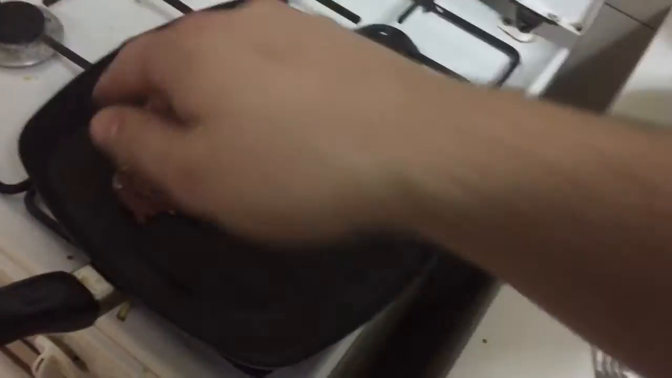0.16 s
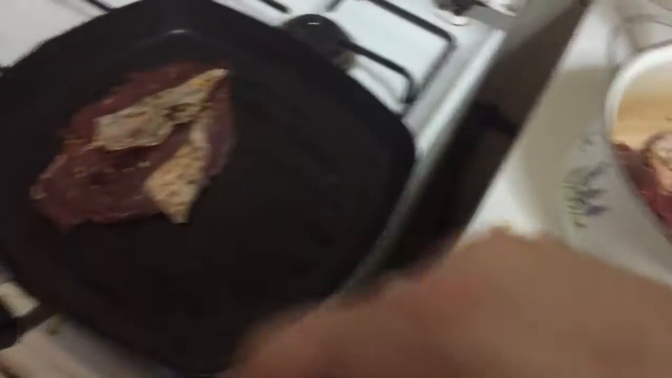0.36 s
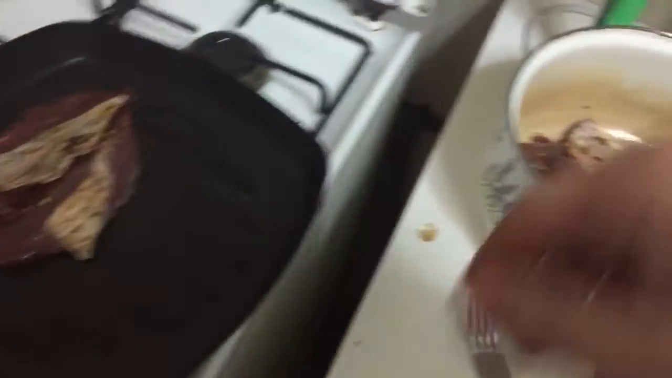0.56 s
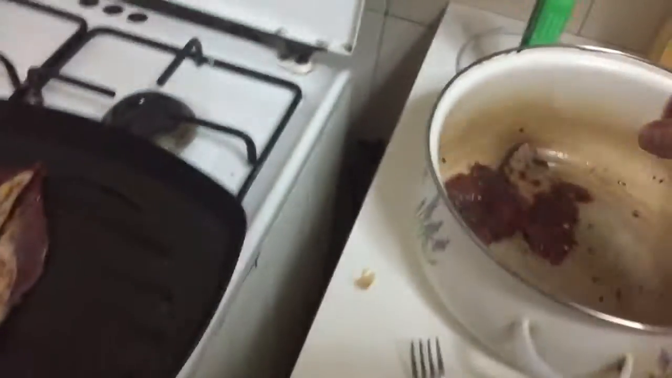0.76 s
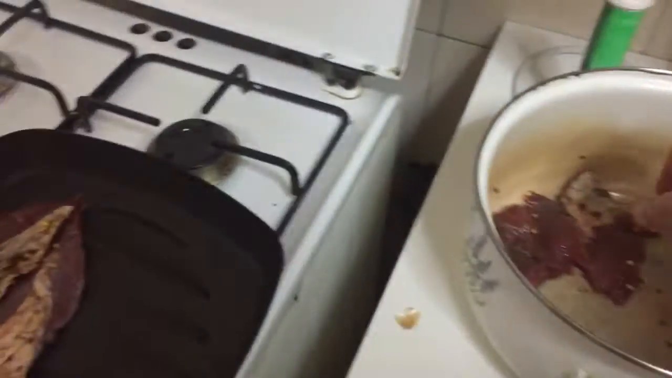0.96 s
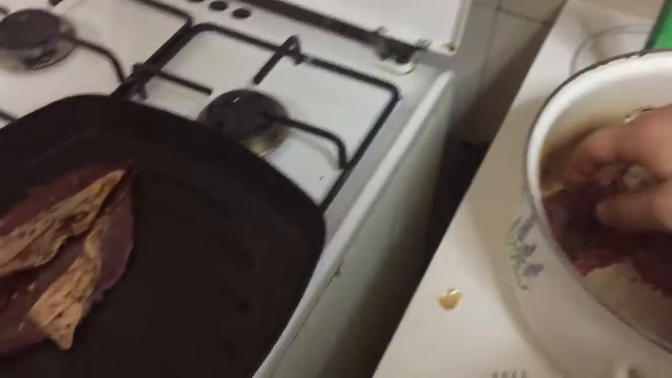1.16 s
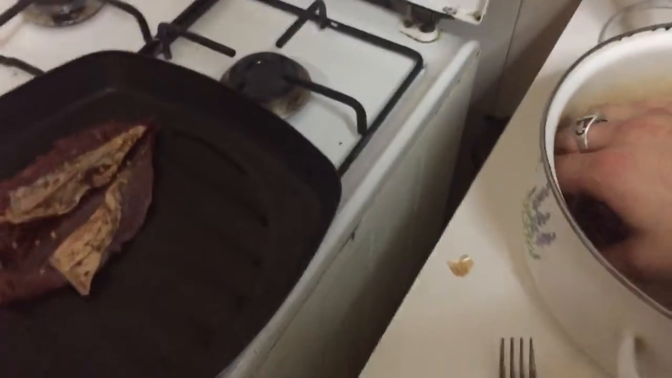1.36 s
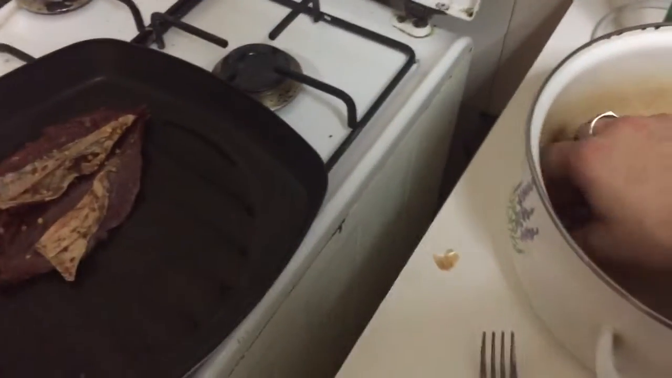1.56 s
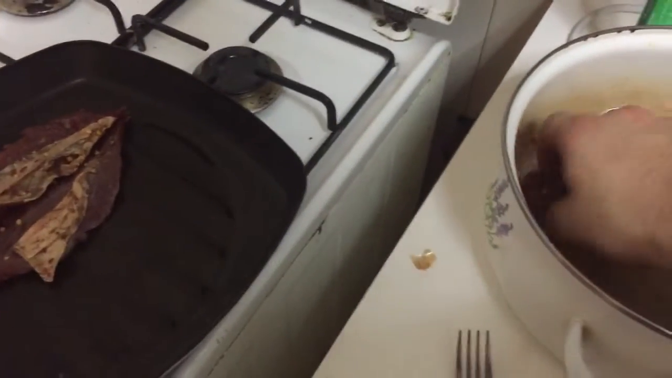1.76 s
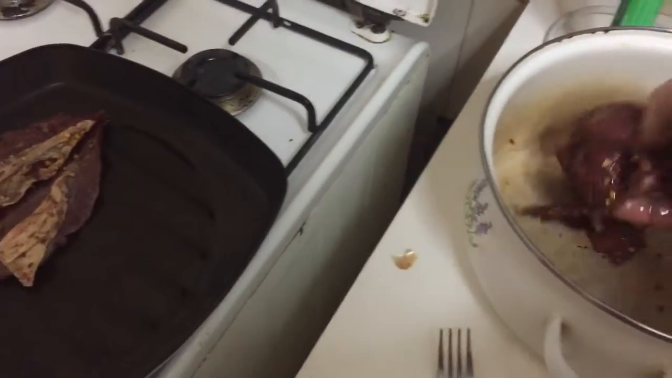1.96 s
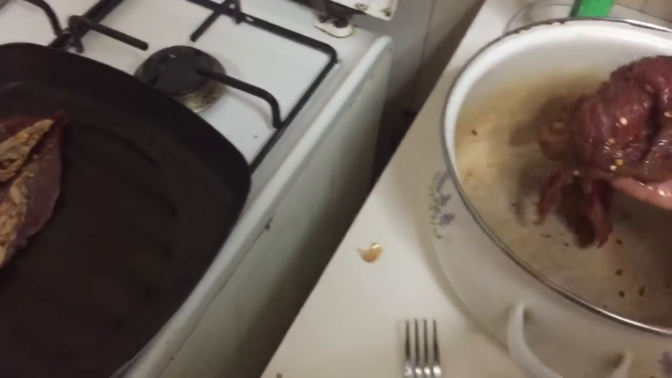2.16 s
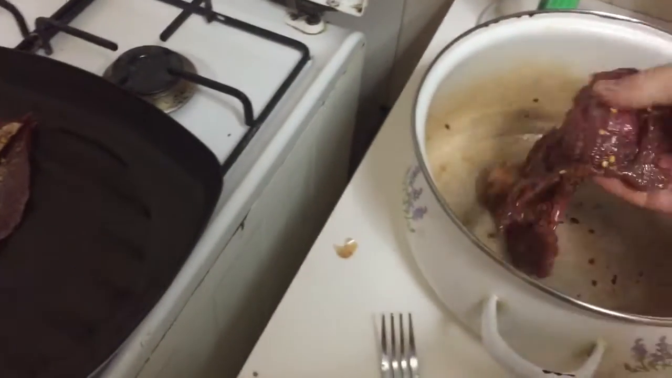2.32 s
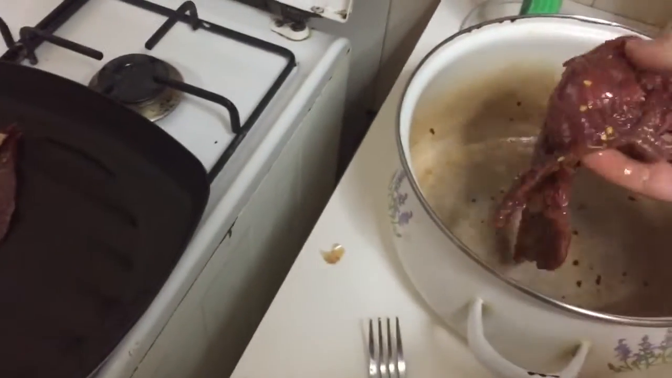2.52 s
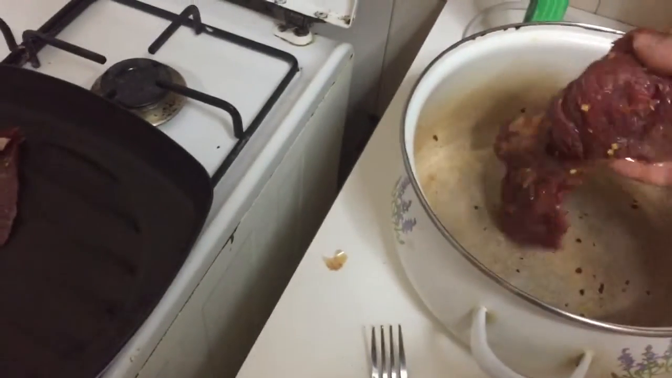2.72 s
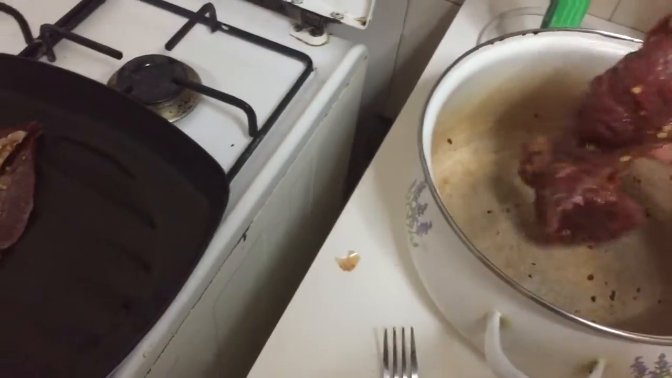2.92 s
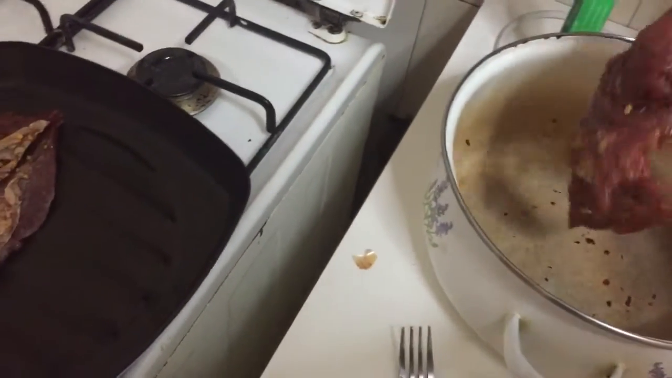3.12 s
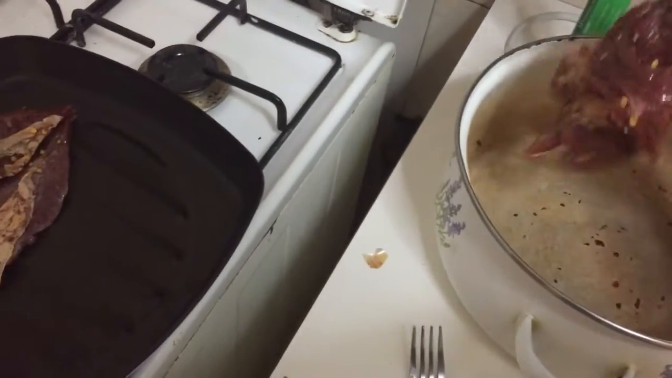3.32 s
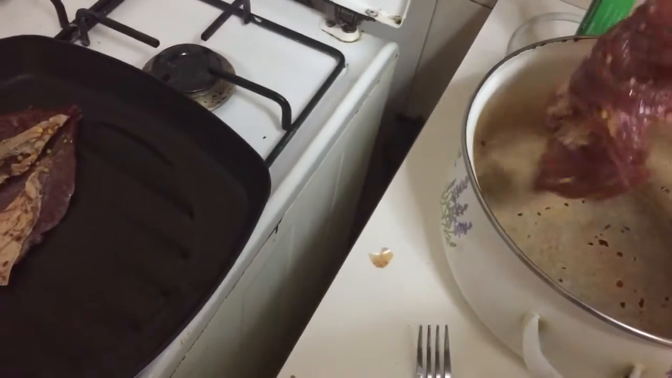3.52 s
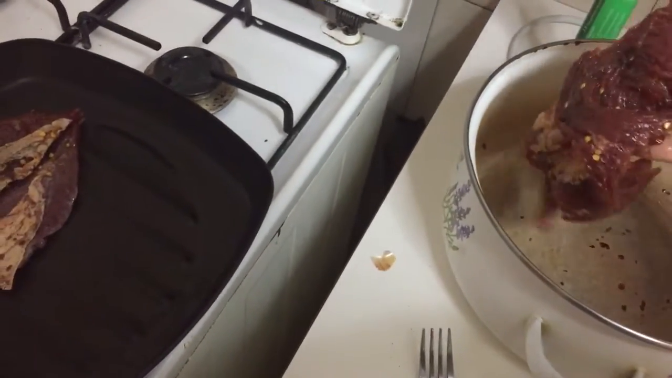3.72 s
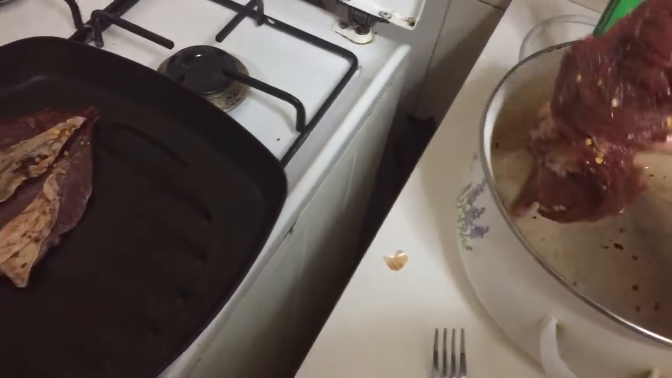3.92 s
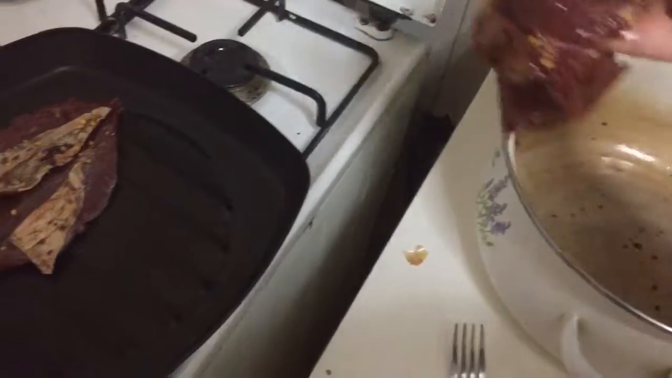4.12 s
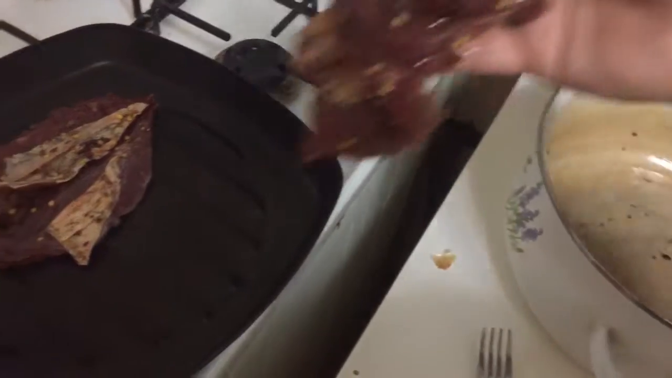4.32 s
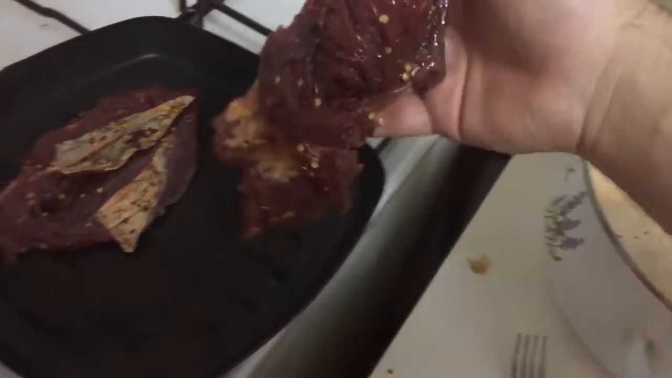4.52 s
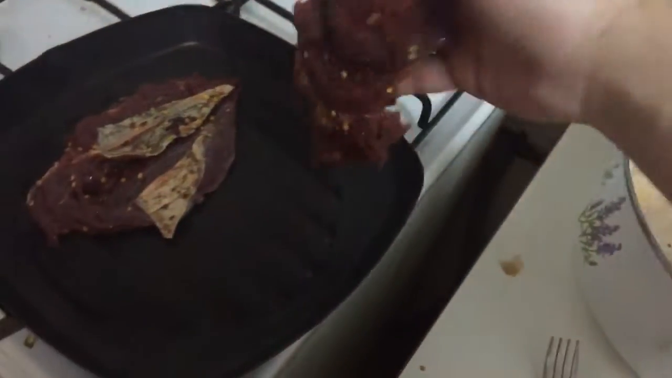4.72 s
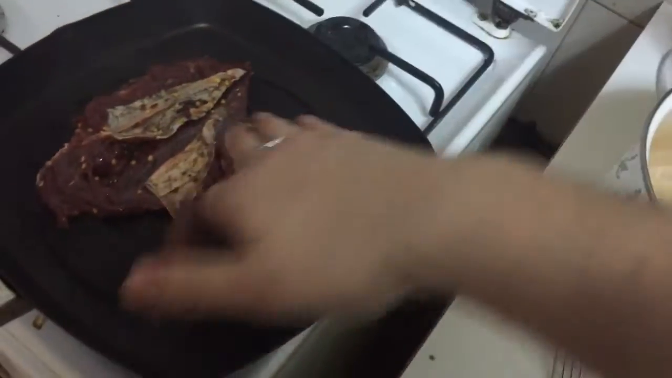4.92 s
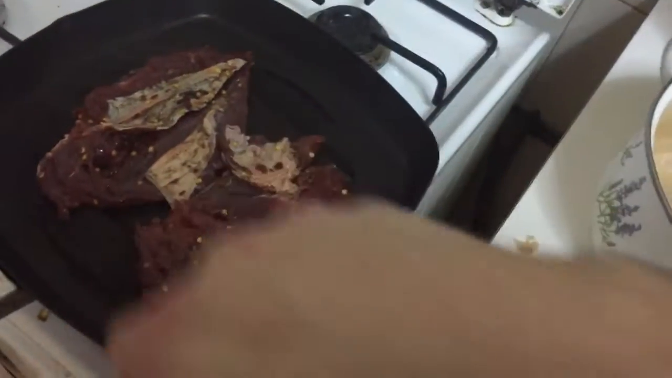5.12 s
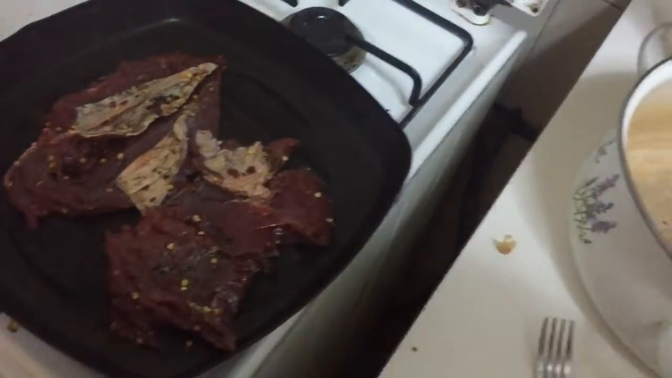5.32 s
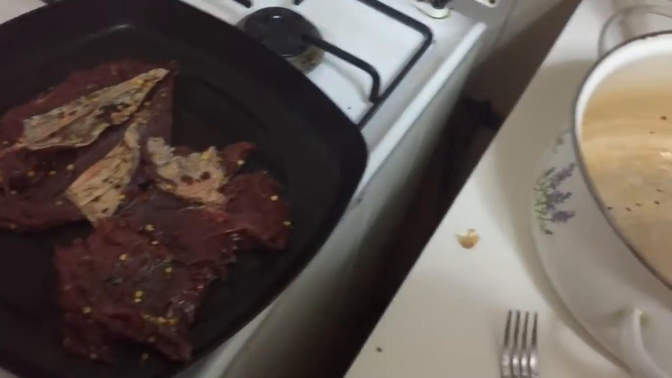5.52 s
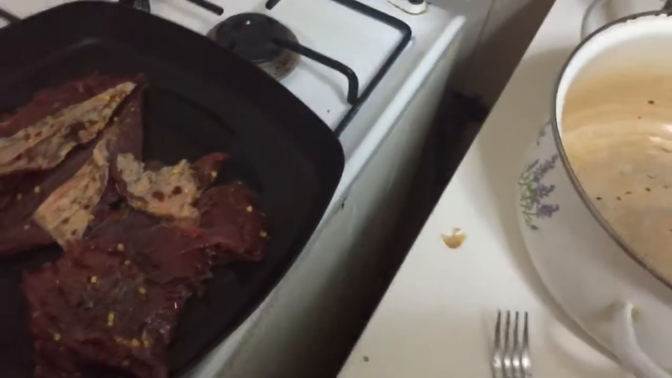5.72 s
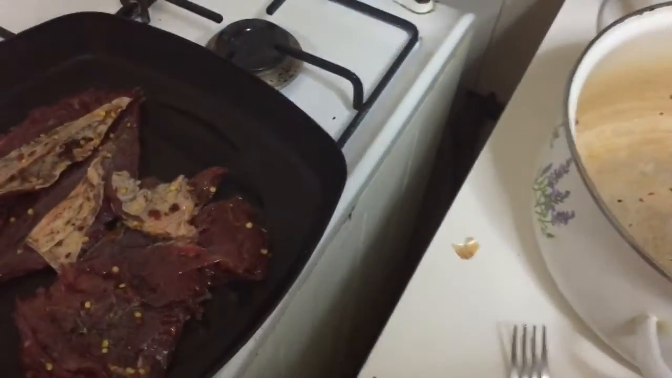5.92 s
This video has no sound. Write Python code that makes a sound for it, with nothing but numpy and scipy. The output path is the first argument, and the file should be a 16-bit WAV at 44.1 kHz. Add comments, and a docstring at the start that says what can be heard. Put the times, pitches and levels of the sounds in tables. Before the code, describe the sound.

Loud close meat sizzle with crackles and fat spits in a small kitchen, begun by one soft wet flop and thickened by another.

```python
"""Meat laid on a hot grill pan

Two thin slices land about five seconds apart, close to a microphone whose signal feeds two equal channels.
Landing is damped sines of clapping air pockets plus squelching noise, both exciting the pan's resonances.
Frying is shaped noise, crackling impulses and damped sines for bubbles; filtered noise makes steam and spits.
Drops tap the microphone's housing as falling sines, noise rumbles in the grip, and sines ring a pot.
Kitchen air lies beneath, and decaying noise serves as the room's echo."""
import sys
import numpy as np
from scipy import signal
from scipy.fft import rfft, irfft, next_fast_len
from scipy.io import wavfile
from scipy.ndimage import map_coordinates

SR = 44100
rng = np.random.default_rng(int(sys.argv[2]) if len(sys.argv) > 2 else 0)


def inscribe(sig):
    """Save sig as 16-bit PCM at rate SR to the path in sys.argv[1].

    A 1-D sig is mono; a 2-D sig holds one channel per row.
    Samples are clipped to [-1, 1] before scaling.
    """
    pcm = np.round(np.clip(np.atleast_2d(sig).T, -1, 1) * 32767)
    wavfile.write(sys.argv[1], SR, pcm.astype(np.int16))


N = 263521  # length in samples

# All levels below are those of each layer before the final mix.
# Relative spectra of room air and of the pan's low mutter: frequency_hz, density_db
AIR_SPECTRUM = [(18, -21), (30, 9), (71, 7), (256, -6), (787, -11.5), (970, -9), (1140, -4.5),
                (1820, -11.5), (2020, -13), (4910, -21.5), (15500, -25)]
MUTTER_SPECTRUM = [(30, 3), (62, -1), (120, -0.5), (210, -10), (320, 3), (455, -14), (580, 6), (730, -26),
                   (1200, -13.5)]
# Relative spectra of coarse, medium and fine fizz, of the fresh slice and of wet meat: frequency_hz, density_db
COARSE_SPECTRUM = [(300, -25), (590, -15), (740, -24), (850, -6.5), (1100, -5.5), (1210, -10), (1290, -2.5),
                   (1390, -7), (1530, 2.5), (1780, 0), (2400, 3.5), (2900, -1.5), (3400, -10), (4500, -28)]
MEDIUM_SPECTRUM = [(2200, -42), (3100, -2), (3800, -1), (4400, 0), (4920, -4), (5400, 0), (6500, 2.5),
                   (7500, -2), (8200, -4.5), (9800, -40)]
FINE_SPECTRUM = [(6500, -29), (8100, -3), (9000, 1), (10000, -1.5), (10450, -2.5), (11100, 1.2),
                 (12300, -0.5), (13800, -1.5), (15600, -1)]
FRESH_SPECTRUM = [(400, -19.5), (740, -15), (870, -7), (1200, -8), (1600, -0.5), (2200, 2), (3150, -7),
                  (4200, 5.5), (4900, 0.5), (6350, 6.5), (7900, 1.5), (9600, 0.5), (10400, -4.5),
                  (11000, -0.5), (15600, -1.5)]
SQUELCH_SPECTRUM = [(35, -22), (80, 5.5), (140, -5), (260, -1), (400, 2), (800, -12), (1500, -3),
                    (4000, -17)]

# Echo decay of the kitchen: frequency_hz, t60_s
ROOM_DECAY = [(200, 0.64), (2000, 0.093), (12000, 0.17)]
# Faint rings of the pot: centre_s, pitch_hz, level_db, half_length_s
POT_RINGS = [(0.038, 1118, -58, 0.026), (0.157, 1600, -61, 0.015), (0.15, 1985, -67, 0.014),
             (0.21, 575, -62, 0.018)]
# Shifts of the hand on the housing: centre_s, level_db, half_length_s
GRIP_SHIFTS = [(0.95, -62, 0.066), (1.24, -59, 0.12), (5.962, -42, 0.03)]
# Drops tapping the housing: start_s, thump_level_db
HOUSING_TAPS = [(0.842, -34), (2.9834, -25), (3.9753, -39.5), (5.4907, -30), (5.854, -38.5)]

# Pan resonances struck by the meat: frequency_hz, width_hz, level_db
PAN_MODES = [(83, 10, -3), (124, 13, 3), (192, 20, -10), (260, 10.4, 3.5), (406, 7.3, -3.5), (540, 26, -6),
             (590, 27, -6), (844, 19, 3)]
# Higher pan resonances that colour the frying: frequency_hz, width_hz, level_db
FRYING_MODES = [(401, 17, 6), (1487, 31, -9), (1710, 17, -7), (2030, 51, -11), (2480, 70, -12),
                (2620, 98, -34), (2850, 36, 0.5), (3760, 130, -7.5), (5220, 120, -13), (6800, 250, -23),
                (9730, 120, -7.5)]

# Jets of steam squeezed from under the first slice:
# start_s, level_db, rise_s, hold_s, fall_db_per_s, frequency_hz, width_hz
STEAM_JETS = [(0.27, -40, 0.12, 0.11, 28, 3640, 1300), (0.23, -50, 0.091, 0.47, 22, 12000, 400),
              (0.43, -43, 0.07, 0.35, 25, 9800, 590), (4.2, -47, 0.38, 0.4, 25, 3900, 390)]
# Spits of fat, the smaller drops generally higher: start_s, peak_db, highpass_hz
FAT_SPITS = [(1.408, -15, 1500), (1.865, -13, 6000), (1.904, -15, 2500), (2.055, -14, 4000),
             (2.9825, -10, 1000), (3.097, -10, 6000), (3.969, -14.5, 4000), (3.976, -14, 6000),
             (4.166, -14, 6000), (5.662, -10, 7000)]
# Lesser spits come at random
SMALL_SPIT_DB, SPIT_SCATTER_DB, SMALL_SPIT_HZ = -18, 0.5, 7000

# Slices landing on the iron:
# start_s, smack_db, squelch_db, folds_db, slump_s, pocket_hz, boom_db
SLICE_LANDINGS = [(0.2339, -37, -42.5, -38.5, 0.0077, 200, -48.5),
                  (5.0564, -29.5, -38, -32, 0.03, 213, -57)]
# Small, tight air pockets that clap out: start_s, level_db, pitch_hz
AIR_CLAPS = [(0.245, -32.5, 774), (0.257, -34, 710), (0.274, -32, 840), (0.315, -39, 540),
             (5.124, -29.5, 835)]
# A landed slice settles for a while, then its sound falls away
SETTLE_S, REST_DB_PER_S = 0.1, 115
# Folds pat down in turn: spacing, scatter of timing, scatter of pitch
FOLD_S, FOLD_SCATTER_S, FOLD_SCATTER_OCTAVES = 0.023, 0.0038, 0.081

# Second slice catching at its edge, then across its face: start_s, level_db, rise_s
FACE_CATCHES = [(5.04, -33.5, 0.1), (5.25, -29.5, 0.11)]
# The first slice's edge touches, then its whole face comes to lie flat
TOUCH_S, TOUCH_RISE_S, FLAT_S = 0.21, 0.071, 0.39
# It boils fully for a while after touching, then dries with this time constant
WET_S, DRYING_S = 1.05, 1.81
# Coarse, medium and fine bubbles: full_boil_db, edge_alone_db, lag_once_flat_s, rise_s, dry_loss_db
BUBBLE_BOIL = [(-38, -7, 0.05, 0.37, 5.5), (-34, -2.5, 0.02, 0.091, 5.5), (-29.5, -4.5, 0.01, 0.085, 6)]
# Hand and meat passing over the pan shade the finest fizz: centre_s, level_db, half_length_s
FIZZ_SHADE = (4.78, -1.9, 0.11)
TOP_HZ = 15750  # middle of the upper band limit


def amp(db):
    """Logarithmic level: decibels become an amplitude gain."""
    return 10 ** (np.asarray(db) / 20)


def unit(x):
    """Power normalisation: scale to rms 1."""
    return x / np.sqrt(np.mean(x ** 2) + 1e-20)


def wobble(rate):
    """Random modulation: a smooth curve through rate random knots a second."""
    return map_coordinates(rng.standard_normal(int(N * rate / SR) + 4), [np.arange(N) * rate / SR])


def swell(start, rise, hold=np.inf, fall_db_per_s=0):
    """Amplitude envelope: an even rise, a hold, then exponential decay."""
    t = np.arange(N) / SR - start
    return np.clip(t / rise, 0, 1) * amp(-fall_db_per_s * np.maximum(t - rise - hold, 0))


def bump(s, half):
    """Gaussian envelope: a bell-shaped curve around a moment."""
    return np.exp(-((np.arange(N) / SR - s) / half) ** 2)


def filtered(x, response):
    """Linear filtering: multiply the spectrum by a response of frequency."""
    m = next_fast_len(N + SR // 2)
    return irfft(rfft(x, m) * response(np.fft.rfftfreq(m, 1 / SR)), m)[:N]


def coloured(x, spectrum):
    """Spectral shaping: dB points joined on a log axis, falling away beyond the ends."""
    f, db = np.transpose(spectrum)
    f = np.r_[f[0] / 2, f, f[-1] * 2]
    db = np.r_[db[0] - 20, db, db[-1] - 20]
    return filtered(x, lambda hz: amp(np.interp(np.log(hz + 1), np.log(f), db)))


def resonated(x, modes):
    """Modal resonance: a sum of second-order bandpass responses."""
    def response(f):
        return sum(amp(db) * 1j * f * width / (centre * centre - f * f + 1j * f * width)
                   for centre, width, db in modes)
    return filtered(x, response)


def bursts(rate, spread_db):
    """Random impulse process: rate events a second, sizes in dB scattered normally, extremes clipped."""
    size = amp(spread_db * np.clip(rng.standard_normal(N), -3, 2.6))
    happens = rng.random(N) < rate / SR
    return unit(happens * size * rng.choice([-1, 1], N))


def cracks(rate, spread_db, spray, spray_db):
    """Bursting films: each releases a snap, then a noise spray lasting a few milliseconds."""
    snaps = bursts(rate, spread_db)
    spray_power = signal.lfilter([1], [1, -np.exp(-2 / (spray * SR))], snaps ** 2)
    hiss = np.sqrt(np.abs(spray_power)) * rng.standard_normal(N)
    return unit(snaps + amp(spray_db) * unit(hiss))


def bubbles(low_hz, high_hz, cycles, spread_db, count):
    """Bubble oscillation: each is a damped sine of its own pitch, dying over a set number of cycles."""
    when, pitch, size = rng.random((count, 3)).T[:, :, None]
    k = np.arange(SR // 150)
    turns = low_hz * (high_hz / low_hz) ** pitch * k / SR
    level = amp(-spread_db * np.log(np.maximum(size, .004)))
    grain = level * np.exp(-turns / cycles) * np.sin(2 * np.pi * turns)
    places = (when * N).astype(int) + k
    return unit(np.bincount(places.ravel(), grain.ravel(), N)[:N])


def frying(spectrum, crackle, crackle_db, ring, ring_db):
    """Superposition: countless bursts merge into hiss, under nearer cracks and ringing bubbles."""
    hiss = rng.standard_normal(N) + amp(crackle_db) * crackle
    return unit(unit(coloured(hiss, spectrum)) + amp(ring_db) * unit(coloured(ring, spectrum)))


def dryness():
    """Exponential drying: how far the first slice has gone from 0 towards 1."""
    return 1 - np.exp(-np.maximum(np.arange(N) / SR - TOUCH_S - WET_S, 0) / DRYING_S)


def boiling(full_db, edge_db, lag, rise, loss_db):
    """Contact boiling: one bubble size grows with the area touching and fades as the juice runs out."""
    edge = amp(edge_db)
    contact = edge * swell(TOUCH_S, TOUCH_RISE_S) + (1 - edge) * swell(FLAT_S + lag, rise)
    return contact * amp(full_db - loss_db * dryness())


def kitchen():
    """Broadband background: room air and burner, and the pan's low mutter easing as the meat dries."""
    air = amp(-64.5) * unit(coloured(rng.standard_normal(N), AIR_SPECTRUM))
    mutter = unit(coloured(bursts(rate=700, spread_db=4.5), MUTTER_SPECTRUM))
    level = swell(TOUCH_S, rise=0.38) * amp(-62 - 3.2 * dryness())
    return air + level * mutter * amp(2.0 * wobble(13))


def room(x):
    """Reverberation: tiled walls answer as decaying noise, in which the bass lingers longest."""
    hz, t, noise = signal.stft(rng.standard_normal(SR // 3), SR, nperseg=256)
    t60 = np.interp(hz, *np.transpose(ROOM_DECAY))
    tail = signal.istft(noise * amp(-60 * t / t60[:, None]), SR, nperseg=256)[1]
    delayed = np.pad(x, (SR // 300, 0))
    return signal.fftconvolve(delayed, tail / np.linalg.norm(tail))[:N]


def pot():
    """Modal ringing: lightly brushed, the enamel pot swells into brief faint sines."""
    t = np.arange(N) / SR
    return sum(amp(db) * bump(s, half) * np.sin(2 * np.pi * hz * t) for s, hz, db, half in POT_RINGS)


def handling():
    """Structure-borne noise: the grip shifts and rumbles through the housing."""
    grip = sum(amp(db) * bump(s, half) for s, db, half in GRIP_SHIFTS)
    rumble = coloured(rng.standard_normal(N), [(35, -20), (65, 7.0), (110, -18), (200, -19), (400, -46)])
    return grip * unit(rumble)


def taps(start_hz=520, end_hz=56, sag=0.0016, decay=0.0075, click_hz=1500, click_decay=0.00027, click_db=9):
    """Impulsive excitation: a drop clicks and pushes the housing, a dull thump whose pitch sags quickly."""
    out, t = np.zeros(N + SR), np.arange(SR // 10) / SR
    # integral of a pitch gliding from start_hz to end_hz
    turns = end_hz * t + (start_hz - end_hz) * sag * (1 - np.exp(-t / sag))
    thump = np.sin(2 * np.pi * turns) * np.exp(-t / decay) * (1 - np.exp(-t / 0.00011))
    click = amp(click_db) * np.sin(2 * np.pi * click_hz * t) * np.exp(-t / click_decay)
    for s, db in HOUSING_TAPS:
        out[round(s * SR):][:len(t)] += amp(db) * (thump + click)
    return out[:N]


def pan_boom(hz=118):
    """Low resonance: the pan booms on its grate under each slice, loudest while still empty."""
    level = sum(amp(db) * swell(s, rise=0.15, hold=0.038, fall_db_per_s=85) for s, *_, db in SLICE_LANDINGS)
    return level * np.sin(2 * np.pi * hz * np.arange(N) / SR)


def steam():
    """Jet noise: trapped steam hisses in narrow bands through gaps between the ribs."""
    jets = np.zeros(N)
    for s, db, rise, hold, fall, hz, width in STEAM_JETS:
        hiss = unit(resonated(rng.standard_normal(N), [(hz, width, 0)]))
        jets += amp(db) * swell(s, rise, hold, fall) * hiss
    return jets * amp(1.2 * wobble(19.2))


def spits(count=40):
    """Vapour explosion: a drop of fat gives a sharp crack and a brief spray of highpassed noise."""
    out, t = np.zeros(N + SR), np.arange(SR // 40) / SR
    small = [(rng.uniform(FLAT_S, N / SR), rng.normal(SMALL_SPIT_DB, SPIT_SCATTER_DB), SMALL_SPIT_HZ)
             for _ in range(count)]
    decay = np.exp(-t / .0003) + amp(-18) * np.exp(-t / .003)  # crack, then spray
    for s, db, hz in FAT_SPITS + small:
        burst = rng.standard_normal(len(t)) * decay
        crack = signal.lfilter(*signal.butter(2, hz, "highpass", fs=SR), burst)
        out[round(s * SR):][:len(t)] += amp(db) * crack / np.abs(crack).max()
    return out[:N]


def smacks(decay=0.013):
    """Flash boiling: the film of juice underneath turns to steam at first touch, a decaying noise burst."""
    t = np.arange(N) / SR
    flash = sum(amp(db) * (t >= s) * np.exp(-np.abs(t - s) / decay) for s, db, *_ in SLICE_LANDINGS)
    noise = coloured(rng.standard_normal(N), [(400, -4), (1000, 5), (2400, 7), (3500, 1), (9000, -21)])
    return flash * unit(noise)


def flops(cycles=0.73, count=12):
    """Impact and resonance: soft folds clap out pockets of air, and the pan rings on beneath."""
    pockets, squelch = list(AIR_CLAPS), np.zeros(N)
    for s, _, squelch_db, folds_db, slump, hz, _ in SLICE_LANDINGS:
        squelch += amp(squelch_db) * swell(s - slump / 10, slump, SETTLE_S, REST_DB_PER_S)
        for k, (late, sharp, strong) in enumerate(rng.standard_normal((count, 3))):
            after = (k + 2) * FOLD_S + FOLD_SCATTER_S * late
            db = folds_db + 1.3 * strong - REST_DB_PER_S * max(after - SETTLE_S, 0)
            pockets.append((s + after, db, hz * 2 ** (FOLD_SCATTER_OCTAVES * sharp)))
    pats, t = np.zeros(N + SR), np.arange(SR // 16) / SR
    for s, db, hz in pockets:
        push = hz * t / cycles
        envelope = push * np.exp(1 - push)  # peaks at 1
        pats[round(s * SR):][:len(t)] += amp(db) * envelope * np.sin(2 * np.pi * hz * t)
    squish = unit(coloured(bursts(rate=900, spread_db=2.5), SQUELCH_SPECTRUM))
    meat = pats[:N] + squelch * squish
    return amp(-3.0) * meat + amp(5.5) * resonated(meat, PAN_MODES)


def second_slice():
    """Contact boiling: the fresh, wet slice fizzes with bubbles of widely ranging pitch."""
    ring = bubbles(1284, 10960, cycles=9.6, spread_db=0, count=9000)
    crackle = cracks(rate=1400, spread_db=5.5, spray=0.0041, spray_db=-1)
    boil = frying(FRESH_SPECTRUM, crackle, crackle_db=-2.5, ring=ring, ring_db=-10.0)
    # edge and face add in power
    contact = np.sqrt(sum((amp(db) * swell(s, rise)) ** 2 for s, db, rise in FACE_CATCHES))
    return contact * boil * amp(0.27 * wobble(150) + 0.38 * wobble(25))


def first_slice():
    """Film bursting: shared cracks span three bubble sizes, and stand out more as the slice dries."""
    coarse, medium, fine = [boiling(*size) for size in BUBBLE_BOIL]
    shade_s, shade_db, shade_half = FIZZ_SHADE
    shade = amp(shade_db * bump(shade_s, shade_half))
    crackle = cracks(rate=1300, spread_db=3.0, spray=0.0015, spray_db=-1.5) * amp(-4.0 + 3.6 * dryness())
    sputter = amp(0.16 * wobble(170) + 0.31 * wobble(35) + 0.49 * wobble(6.4))
    low_ring = bubbles(689, 3480, cycles=5.5, spread_db=2.5, count=3500)
    mid_ring = bubbles(3032, 8150, cycles=18, spread_db=2.5, count=6000)
    top_ring = bubbles(7500, 14900, cycles=2.1, spread_db=1.0, count=9000)
    low = coarse * frying(COARSE_SPECTRUM, crackle, -1.1, low_ring, ring_db=-5)
    mid = medium * frying(MEDIUM_SPECTRUM, crackle, -9, mid_ring, ring_db=-8.5)
    top = fine * frying(FINE_SPECTRUM, crackle, 0, top_ring, ring_db=-11.0)
    return sputter * (low + mid + shade * top)


def scene():
    """Superposition: frying rings the pan and fills the room, and all reaches one microphone."""
    sizzle = first_slice() + second_slice() + steam() + spits() + smacks()
    pan = sizzle + resonated(sizzle, FRYING_MODES) + flops() + pan_boom()
    echo = amp(-14) * room(pan)
    mono = amp(-0.8) * (pan + echo) + taps() + handling() + pot() + kitchen()
    return np.array([mono, mono])


def record(dry):
    """Band limiting: a highpass drops the deepest bass and a steep slope removes the highest treble."""
    bass_cut = signal.butter(4, 38, "highpass", fs=SR, output="sos")

    def band_limit(hz):
        """Linear transition: gain falls from 1 to 0 over 200 Hz."""
        return np.clip(.5 + (TOP_HZ - hz) / 200, 0, 1)
    return np.array([filtered(channel, band_limit) for channel in signal.sosfilt(bass_cut, dry)])


dry = scene()
out = record(dry)
inscribe(out)
```